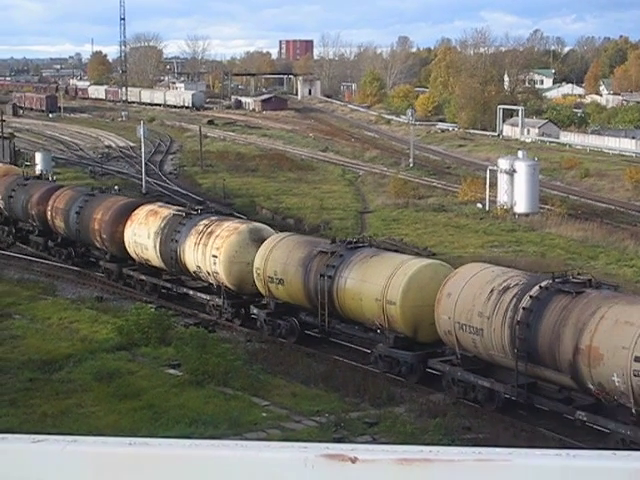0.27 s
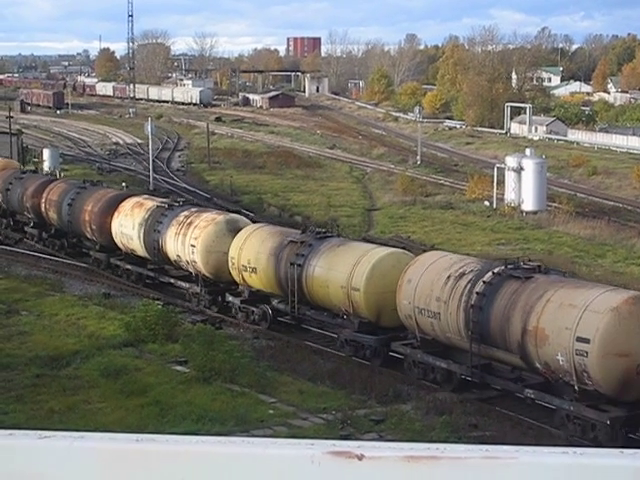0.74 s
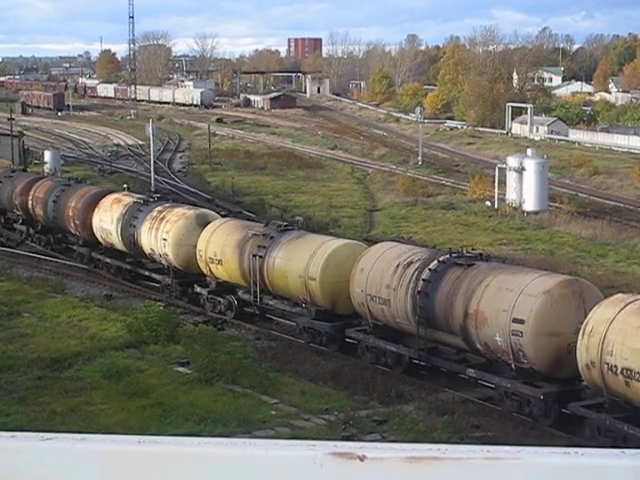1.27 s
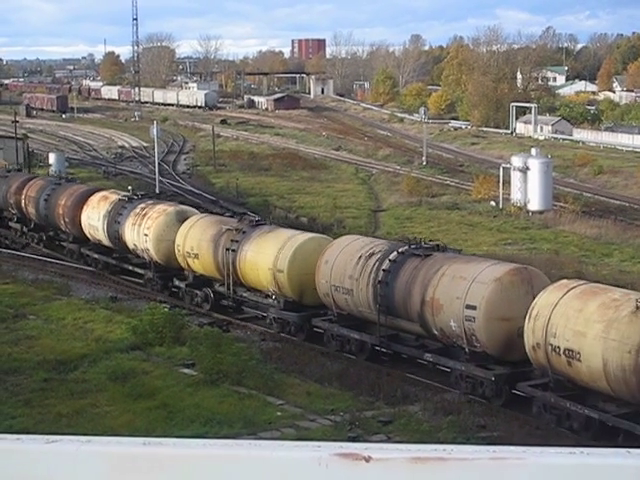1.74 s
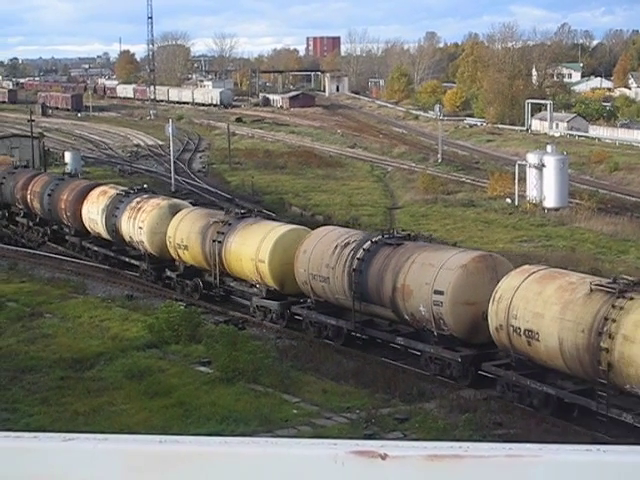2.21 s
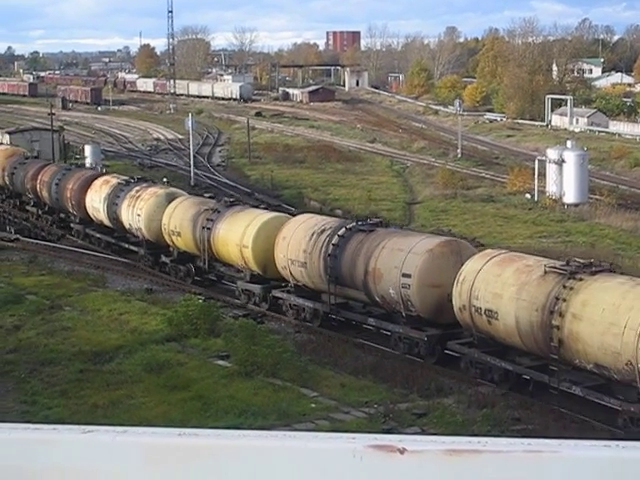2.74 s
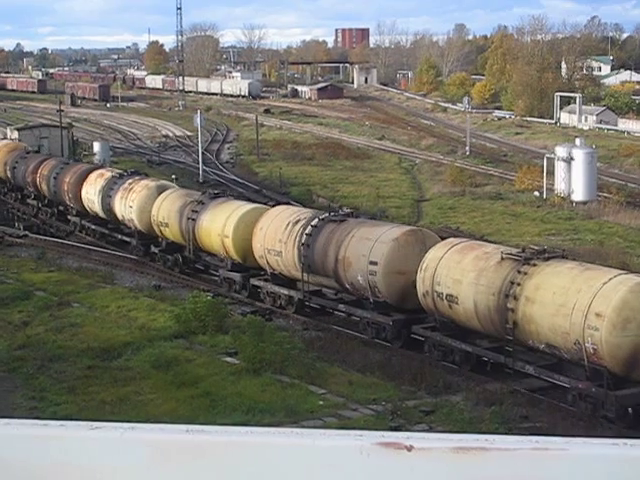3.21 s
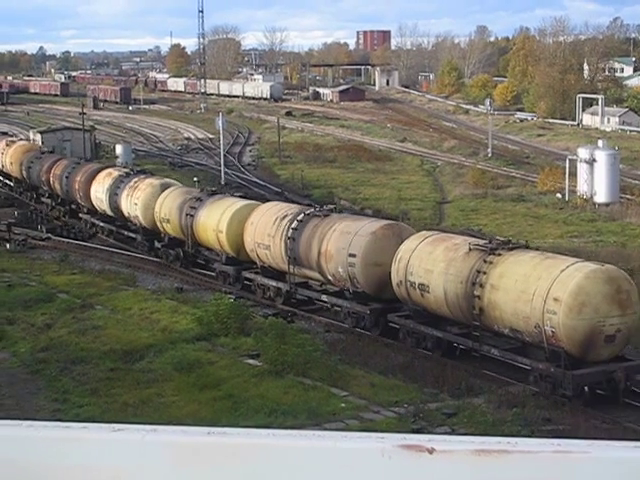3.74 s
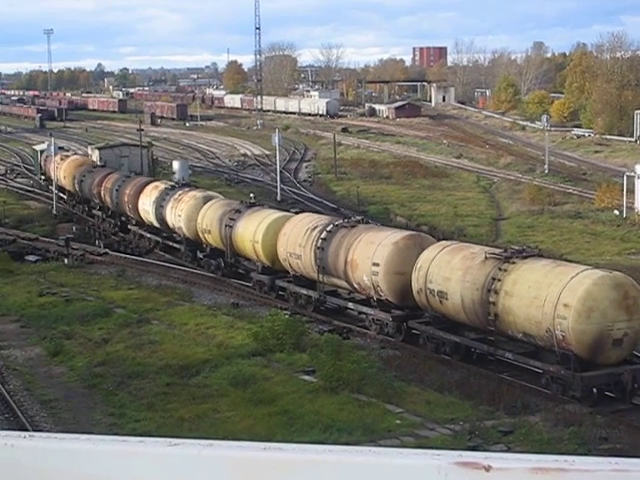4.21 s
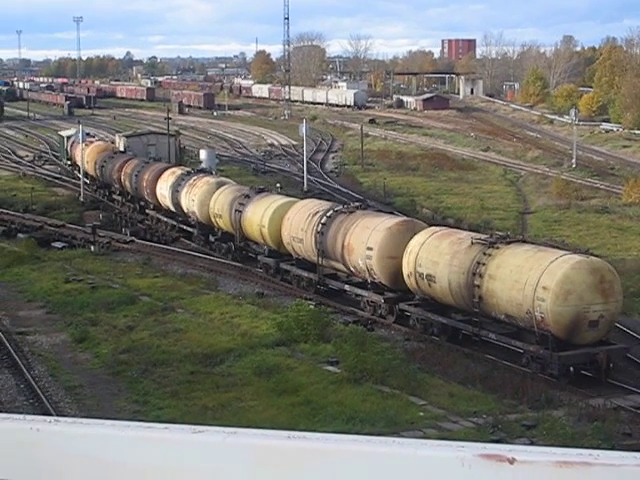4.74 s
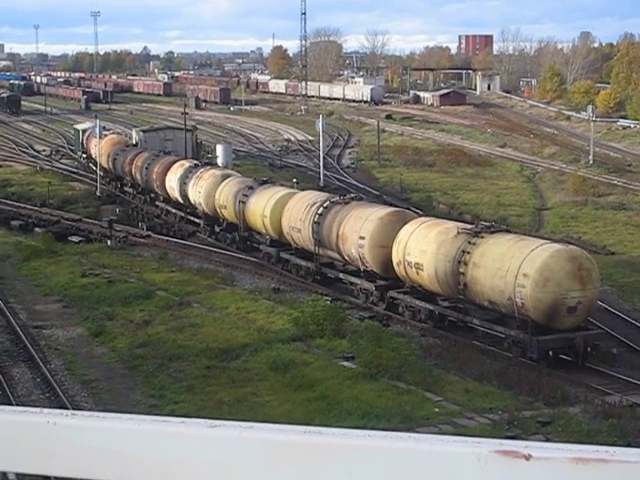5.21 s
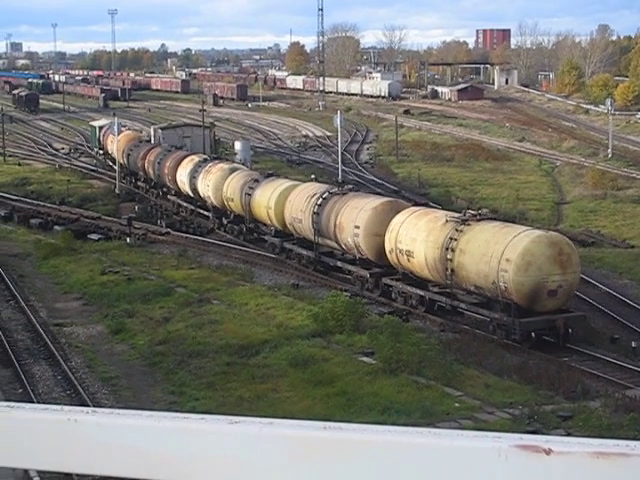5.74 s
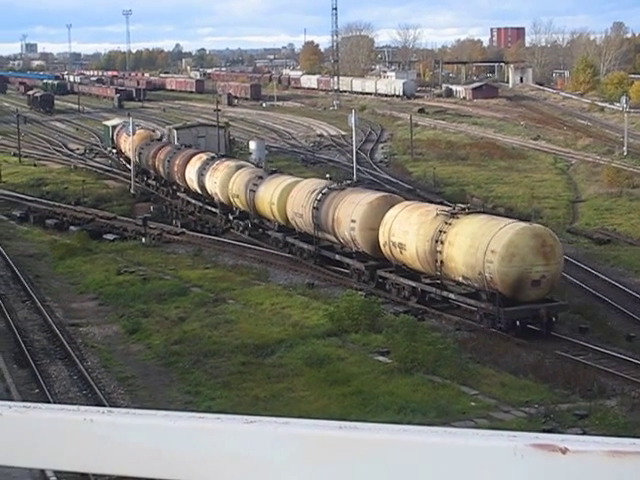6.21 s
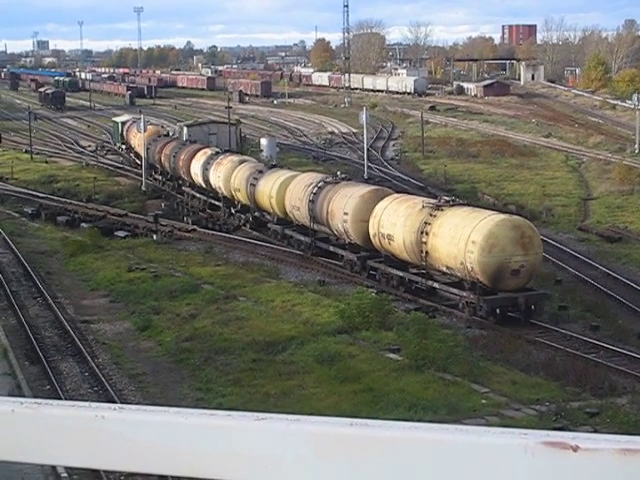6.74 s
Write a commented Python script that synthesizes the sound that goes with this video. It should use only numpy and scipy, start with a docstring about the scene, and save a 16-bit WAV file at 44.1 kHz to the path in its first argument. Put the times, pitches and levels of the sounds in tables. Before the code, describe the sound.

From 0 s a heavy tank train rolls past close by in an open yard: deep ground thuds, a dense low rumble and a coarse mid roar, surging unevenly, with brake shoes hissing and grit sizzling on top. Faint high chatter and short squeaks flicker through; light coupling pings sound near 0.6, 0.9, 1.2 and 1.8 s, with quick chirps around 1.8 and 2.2 s. From 2.8 to 3.4 s thin high notes sing weakly inside the roar. A knock at 3.45 s leads to a hard cluster of clanks near 4.0 s, and the rumble sinks away. Piercing squeals burst out at 4.1 s and 4.4-4.9 s, a knock among them at 4.6 s. From 5 to 7 s, over fading rolling and a quiet yard drone, several wheels squeal together, medium-high to very shrill, wavering, beating and overlapping, unfinished at the end. The small camera sound is gritty, with harsh, limited treble.

```python
"""A train of tank wagons rolls through a yard brake below a footbridge, over the steady drone of the yard.
From the start wheels rumble and roar (noise bands), shoes hiss on treads and wheel discs chatter faintly
(narrow random bands); short locked notes and coupling knocks (decaying sines) soon join in.
After about four seconds the rumble sinks away and several discs squeal loudly at their own modes.
A small camera samples all this slowly, so the treble is mirrored about half its sampling rate."""
import sys
import numpy as np
from scipy import signal
from scipy.fft import rfft, irfft, next_fast_len
from scipy.io import wavfile
from scipy.ndimage import uniform_filter1d, minimum_filter1d, map_coordinates

SR = 44100
rng = np.random.default_rng(int(sys.argv[2]) if len(sys.argv) > 2 else 0)


def int16_out(signal):
    """Quantize to a 16-bit WAV file."""
    q = np.round(np.clip(np.atleast_2d(signal).T, -1, 1) * 32767)
    wavfile.write(sys.argv[1], SR, q.astype(np.int16))


N = 306916  # length in samples


def amp(db):
    """Level: 20 dB is a factor of ten in amplitude."""
    return 10 ** (np.asarray(db) / 20)


def unit(x):
    """Normalisation: scales a signal to an rms value of 1."""
    return x / np.sqrt(np.mean(np.abs(x) ** 2) + 1e-20)


def along(points, hz):
    """Spectral envelope: levels interpolated along a logarithmic frequency axis."""
    f, level = np.transpose(points)
    return np.interp(np.log(hz + 1), np.log(f + 1), level)


def curves(rows):
    """Time envelopes: one value per sample for each column after the time."""
    s, *columns = np.transpose(rows)
    return [np.interp(np.arange(N) / SR, s, column) for column in columns]


def wobble(rate):
    """Slow random modulation: a spline through random knots, at most 90 a second."""
    knots = rng.standard_normal(int(N * 90 / SR) + 4)
    return map_coordinates(knots, [np.arange(N) * min(rate, 90) / SR])


def filtered(x, response):
    """Linear filtering: the spectrum is multiplied by a response of frequency."""
    m = next_fast_len(N + 8192)
    return irfft(rfft(x, m) * response(np.fft.rfftfreq(m, 1 / SR)), m)[..., :N]


def rush(spectrum, patchy_db):
    """Coloured noise: white noise with patches of random gain in time and frequency, then filtered."""
    z = signal.stft(rng.standard_normal(N + 512), nperseg=512)[2]
    field = uniform_filter1d(rng.standard_normal(z.shape), size=4, axis=0)
    field = uniform_filter1d(field, size=12, axis=1)
    patchy = signal.istft(z * amp(patchy_db * unit(field)), nperseg=512)[1][:N]
    return unit(filtered(patchy, lambda hz: amp(along(spectrum, hz))))


def smear(size, width_hz, skirt_db):
    """Narrow-band noise: a complex random swing of rms 1 with a narrow core and a weak wide skirt."""
    m = next_fast_len(size)
    off = np.fft.fftfreq(m, 1 / SR) / width_hz
    shape = np.exp(-.7 * off ** 2) + amp(skirt_db) / (1 + (off / 1.8) ** 2)
    random_phase = np.exp(2j * np.pi * rng.random(m))
    return unit(np.fft.ifft(shape * random_phase)[:size])


def evened(swing):
    """Self-limiting oscillation: friction feeds a weak swing and curbs a strong one."""
    share = .25  # how much of the level swings is ironed out
    return unit(swing / (np.abs(swing) + 0.06) ** share)


def sample_at(t):
    """Sampling: the nearest sample number for each time."""
    return np.round(t * SR).astype(int)


def squeal(start, end, hz_of, swing_of, db_of, octave_db, fade):
    """Modal vibration: a swing carried at the mode's pitch, with the octave of the lopsided slip."""
    a, b = max(round(start * SR), 0), min(round(end * SR), N)
    t = np.arange(a, b) / SR
    carrier = np.exp(2j * np.pi * np.cumsum(hz_of(t)) / SR)
    swing = swing_of(b - a) * carrier
    swing = swing + amp(octave_db) * swing ** 2 / (np.abs(swing) + .1)
    time_left = end - t + (b >= N - 2)  # a sound cut by the end of the scene does not fade out
    edge = np.clip(np.minimum(t - start, time_left) / fade, 0, 1)
    return slice(a, b), np.sqrt(2) * amp(db_of(t)) * edge * swing.real


# far yard, relative spectral density: f/Hz, level/dB
YARD_SPECTRUM = [(24, -41), (40, -7.5), (160, -7), (300, -2), (420, -12), (700, -14), (1020, -5.5),
                 (1300, -12.5), (1800, -16.5), (2340, -42), (3960, -120)]


def yard():
    """Stationary noise: the steady drone of the far yard."""
    return amp(-43) * rush(YARD_SPECTRUM, patchy_db=1)


# rolling noise: t/s, thud level/dB, rumble level/dB, roar level/dB
ROLLING_LEVELS = [(0, -21, -18.5, -22.5), (.9, -21.5, -19, -23.5), (1.07, -27.5, -21, -25),
                  (1.3, -24.5, -19, -22), (2.1, -23.5, -19.5, -22.5), (3.0, -24, -19.5, -22),
                  (3.42, -23.5, -22, -22), (3.9, -29.5, -20.5, -21), (4.08, -32.5, -26, -22),
                  (4.14, -35, -29.5, -25), (4.24, -34, -30.5, -29), (4.5, -26, -26, -23.5),
                  (4.6, -38, -32.5, -30.5), (4.92, -35, -28.5, -30.5), (5.0, -50, -42.5, -43),
                  (5.27, -41, -35.5, -38), (5.68, -48.5, -47.5, -45.5), (5.95, -47, -43, -42),
                  (6.55, -42, -38, -39), (6.96, -42.5, -39, -39)]
# relative spectral densities of ground and bridge, wagon bodies, and rails: f/Hz, level/dB
THUD_SPECTRUM = [(12, -42), (20, -3.5), (22, -11), (54, -2), (170, -1), (220, -26), (370, -120)]
RUMBLE_SPECTRUM = [(97, -33.5), (165, -8), (232, 2.5), (409, -8.5), (450, -9.5), (580, -33), (990, -120)]
ROAR_SPECTRUM = [(240, -22.5), (400, -5.5), (576, 2), (760, -1), (890, -2), (978, 0.5), (1200, -2.5),
                 (1320, -7.5), (1570, -4.5), (1800, -15), (2340, -19), (3960, -120)]


def rolling(surge_db, jolt, grain):
    """Roughness excitation: rough treads shake ground, wagons and rails, each with its own spectrum."""
    thud_db, rumble_db, roar_db = curves(ROLLING_LEVELS)
    thud_db = thud_db + 0.65 * surge_db + 0.55 * jolt + 1.2 * grain + 0.49 * wobble(6)
    rumble_db = rumble_db + 0.51 * surge_db + 0.98 * jolt + 1.3 * grain
    roar_db = roar_db + surge_db + 0.5 * jolt + 1.7 * grain
    thud = amp(thud_db) * rush(THUD_SPECTRUM, patchy_db=1.76)
    rumble = amp(rumble_db) * rush(RUMBLE_SPECTRUM, patchy_db=1.0)
    roar = amp(roar_db) * rush(ROAR_SPECTRUM, patchy_db=1.5)
    return thud + rumble + roar


# rubbing noise: t/s, hiss level/dB, sizzle level/dB
RUBBING_LEVELS = [(0, -32.5, -33), (.25, -30, -28), (.4, -34.5, -33.5), (.95, -29, -29), (1.07, -29, -35),
                  (1.5, -28, -28.5), (2.1, -32.5, -33.5), (2.25, -28, -31), (2.6, -28.5, -29.5),
                  (3.1, -29, -26), (3.42, -29, -28.5), (4.0, -26.5, -27), (4.13, -36.5, -34.5),
                  (4.6, -34, -34), (5.1, -39, -37.5), (5.35, -39, -35), (5.58, -36.5, -30),
                  (5.64, -42.5, -38.5), (6.3, -38.5, -39), (6.96, -38, -40)]
# relative spectral densities of shoes on treads, and of grit under the shoes: f/Hz, level/dB
HISS_SPECTRUM = [(1000, -18.5), (1700, -9), (1840, -4), (2380, -4), (3310, -1), (4000, -7.5), (5200, -24.5),
                 (8800, -120)]
SIZZLE_SPECTRUM = [(2350, -23.5), (4000, -4), (4470, -1.5), (4840, -6.5), (5500, -11), (7150, -46.5),
                   (12100, -120)]


def rubbing(surge_db, jolt, grain):
    """Friction noise: shoes hiss on the treads and grit sizzles under them."""
    hiss_db, sizzle_db = curves(RUBBING_LEVELS)
    hiss_db = hiss_db + 0.24 * surge_db + 1.2 * jolt + 0.92 * grain
    sizzle_db = sizzle_db + 0.44 * jolt
    hiss = amp(hiss_db) * rush(HISS_SPECTRUM, patchy_db=1.5)
    sizzle = amp(sizzle_db) * rush(SIZZLE_SPECTRUM, patchy_db=1.5)
    return hiss + sizzle


# wheel modes by name: drift of the centre as (t/s, f/Hz), width before evening/Hz, octave level/dB
WHEEL_MODES = {"low": ([(4.2, 1970), (4.5, 1990), (4.7, 1953), (5.0, 1985), (5.6, 1990), (5.8, 1990),
               (5.95, 2014), (6.15, 2001), (6.6, 2004), (6.75, 2034), (6.9, 2050)], 30.5, -27),
               "low twin": ([(4.5, 2040), (4.8, 2090), (5.1, 2070), (5.35, 2090), (5.6, 2082), (5.9, 2076),
               (6.3, 2057), (6.5, 2113), (6.7, 2056), (6.9, 2100)], 39, -29.5), "thin": ([(5.3, 2460),
               (6.0, 2386), (6.15, 2431), (6.8, 2480)], 33, -19.5), "dull": ([(1.2, 2646)], 54, -64),
               "shrill": ([(5.36, 2947), (5.5, 2883), (5.6, 2915), (5.74, 2900), (5.9, 2914), (6.1, 2933),
               (6.3, 2905), (6.5, 2900), (6.8, 2945)], 44, -21), "shrill twin": ([(4.75, 3045),
               (4.93, 3015), (5.0, 3030), (5.45, 3024), (6.4, 3000)], 32, -44.5), "sharp": ([(4.88, 3083),
               (5.05, 3145), (5.2, 3066), (5.32, 3113), (5.5, 3140), (5.75, 3140), (5.97, 3180),
               (6.2, 3130)], 30, -54.5), "brief": ([(.4, 3290), (1.1, 3390), (1.3, 3360), (4.5, 3420),
               (6.4, 3280)], 74, -60.5), "keen": ([(.8, 3510), (2.6, 3597), (3.9, 3590), (6.7, 3570),
               (6.9, 3540)], 55, -65.5), "keen twin": ([(4.2, 3676), (5.3, 3632)], 60, -52),
               "short": ([(2.0, 3945), (4.7, 3930), (5.1, 4013), (6.3, 3990)], 56, -67.5),
               "high": ([(1.0, 4190), (1.3, 4093), (4.2, 4080), (4.47, 4030), (4.6, 4130), (4.9, 4118),
               (5.3, 4140), (6.1, 4150), (6.3, 4170), (6.7, 4140), (6.9, 4170)], 65, -57.5),
               "high twin": ([(1.1, 4300), (1.35, 4280), (4.85, 4240), (5.2, 4260), (5.33, 4270),
               (6.25, 4215), (6.38, 4270), (6.48, 4320), (6.7, 4295), (6.82, 4250), (6.96, 4235)], 37, -49),
               "bright": ([(.15, 4414), (.9, 4500), (1.8, 4513), (3.0, 4554), (4.0, 4534)], 77, -57.5),
               "peep": ([(1.25, 4880), (5.3, 4770)], 30, -63), "whistle": ([(.5, 5090), (.7, 5120),
               (.95, 5060)], 66, -74), "topmost": ([(2.0, 5495)], 40, -57)}
# modes that chatter without a break: mode, level as (t/s, level/dB)
HELD_CHATTER = [("bright", [(1.6, -36), (1.77, -25.5), (1.91, -37), (2.2, -29.5), (2.88, -31),
                (3.04, -23.5), (3.42, -37), (3.88, -26), (4.05, -37.5)]), ("keen", [(2.95, -39),
                (3.33, -22), (3.42, -30), (3.55, -29.5), (3.63, -27), (3.95, -35.5)]),
                ("keen twin", [(4.1, -23.5), (4.2, -16.5), (4.34, -31.5), (4.83, -34), (4.95, -21),
                (5.1, -28), (5.2, -27.5), (5.39, -32.5), (5.46, -33), (5.57, -44)]), ("low", [(4.15, -28),
                (4.24, -38), (4.36, -28), (4.47, -14.5), (4.65, -27), (4.72, -16.5), (5.0, -23.5),
                (5.3, -24), (5.56, -26), (5.75, -27.5), (6.0, -28), (6.12, -30), (6.3, -33), (6.5, -33),
                (6.96, -37.5)]), ("short", [(4.45, -32.5), (4.96, -32), (5.15, -40.5), (5.25, -29.5),
                (5.75, -44), (5.95, -32.5), (6.08, -43), (6.25, -36), (6.4, -39.5)]),
                ("high", [(4.48, -29.5), (4.63, -24), (4.78, -35), (4.85, -29), (5.15, -40), (5.24, -26.5),
                (5.38, -26.5), (5.77, -37.5), (6.05, -36.5), (6.26, -24), (6.4, -39.5), (6.96, -21.5)]),
                ("thin", [(4.5, -39), (5.05, -46.5), (5.19, -38), (6.1, -37), (6.4, -32), (6.7, -50),
                (6.9, -38)]), ("low twin", [(4.45, -30), (4.62, -30.5), (4.85, -30.5), (5.03, -37),
                (5.37, -18.5), (5.42, -26), (5.6, -34), (5.7, -38.5), (5.88, -33), (6.15, -30),
                (6.31, -34.5), (6.62, -35.5), (6.84, -38), (6.96, -30.5)]), ("shrill", [(5.36, -34),
                (5.43, -25), (5.5, -21), (5.6, -15), (5.65, -23.5), (5.79, -15.5), (6.0, -21),
                (6.19, -18.5), (6.3, -25), (6.47, -30.5), (6.67, -28.5), (6.72, -35), (6.78, -32),
                (6.96, -31.5)])]
# short spells of chatter: mode, start t/s, end t/s, start level/dB, end level/dB
CHATTER_SPELLS = [("bright", 0.11, .36, -28.5, -37), ("bright", .45, .94, -31.5, -29),
                  ("whistle", .45, .72, -32, -30), ("whistle", .76, 0.91, -32, -31),
                  ("keen", .65, 1.02, -33.5, -39), ("high", 0.98, 1.05, -27.5, -28),
                  ("high", 1.1, 1.3, -33, -30.5), ("high twin", 1, 1.36, -34.5, -36.5),
                  ("brief", 0.43, .46, -35, -36), ("keen", 0, .25, -44, -39),
                  ("high", 4.19, 4.25, -34, -36), ("brief", 4.22, 4.3, -36, -39),
                  ("brief", 4.4, 4.78, -39, -42.5), ("shrill twin", 4.45, 4.6, -38.5, -40.5),
                  ("brief", 1.1, 1.29, -28.5, -31.5), ("dull", 1.22, 1.42, -33, -32),
                  ("dull", 1.5, 1.72, -33, -35), ("dull", 2.3, 2.4, -38, -36),
                  ("high", 1.8, 1.95, -32, -35), ("peep", 1.25, 1.35, -38, -41),
                  ("topmost", 1.66, 1.76, -38.5, -44), ("short", 1.8, 2.03, -30.5, -31.5),
                  ("keen", 2.52, 2.66, -27.5, -27.5), ("topmost", 2.88, 2.96, -30.5, -35),
                  ("topmost", 3.0, 3.4, -39, -36.5), ("topmost", 3.45, 3.95, -41.5, -43),
                  ("dull", 3.36, 3.6, -29.5, -31.5), ("short", 3.62, 3.98, -32.5, -30.5),
                  ("dull", 3.75, 3.97, -36, -36), ("topmost", 4.3, 4.9, -50, -50),
                  ("shrill twin", 4.77, 5.0, -33, -30.5), ("high twin", 4.84, 5.4, -29.5, -37),
                  ("sharp", 4.93, 5.15, -26, -28), ("peep", 5.2, 5.5, -41, -45),
                  ("keen", 5.42, 5.55, -38, -42), ("sharp", 5.31, 5.5, -26.5, -29),
                  ("shrill twin", 5.36, 5.57, -29, -31), ("sharp", 5.76, 6.25, -33, -43.5),
                  ("high twin", 6.2, 6.34, -28.5, -27.5), ("high twin", 6.42, 6.96, -27.5, -24.5),
                  ("brief", 6.24, 6.68, -36, -38), ("shrill twin", 6.36, 6.68, -31, -35),
                  ("keen", 6.7, 6.96, -30.5, -21.5)]


def chattering_modes():
    """Stick-slip excitation: shoes chatter on the wheels in narrow bands about the disc modes."""
    swell_s, ring_s = .07, .1  # swelling up before the first level, dying back after the last
    edge_db = -15.5  # level at both ends, relative to the neighbouring level
    wander_hz, falter_db = 5.01, 1.6  # scales of the wavering in pitch and level
    out = np.zeros(N)
    spells = [(mode, [(a, a_db), (b, b_db)]) for mode, a, b, a_db, b_db in CHATTER_SPELLS]
    for mode, level in HELD_CHATTER + spells:
        s, db = np.transpose(level)
        s = np.r_[s[0] - swell_s, s, s[-1] + ring_s]
        db = np.r_[db[0] + edge_db, db, db[-1] + edge_db]
        drift, width_hz, octave_db = WHEEL_MODES[mode]
        wander, falter = wobble(9), wobble(45)
        centre = lambda t: np.interp(t, *np.transpose(drift)) + wander_hz * wander[sample_at(t)]
        chatter = lambda n: evened(smear(n, width_hz, skirt_db=-28))
        loudness = lambda t: np.interp(t, s, db) + falter_db * falter[sample_at(t)]
        where, sound = squeal(s[0], s[-1], centre, chatter, loudness, octave_db, fade=0.012)
        out[where] += sound
    return out


# surges of the rolling and rubbing noise: t/s, rise in level before each layer's share/dB
LEVEL_SURGES = [(.24, 4), (.5, 1.5), (1.02, 2), (1.51, 3), (1.85, 0), (3.55, 1.5), (4.038, 8), (4.401, 5.5),
                (4.87, 3)]


def level_surges():
    """Asymmetric surges: the rolling and rubbing noise swells slowly and drops off fast."""
    build_s, cut_s = 0.063, 0.022
    t = np.arange(N) / SR
    return sum(db * np.exp(-((t - s) / np.where(t < s, build_s, cut_s)) ** 2) for s, db in LEVEL_SURGES)


# notes where the slip locks onto one pitch: start t/s, end t/s, f/Hz, level/dB
LOCKED_NOTES = [(0.38, 0.528, 4380, -30.5), (0.943, 1.037, 4222, -27), (1.215, 1.302, 2540, -31),
                (1.249, 1.32, 4100, -27), (1.195, 1.326, 4785, -29), (1.49, 1.6, 4820, -31),
                (1.074, 1.3, 3390, -41), (1.817, 1.991, 3900, -33), (2.047, 2.183, 4522, -29),
                (2.77, 3.107, 4550, -27.5), (2.86, 3.38, 5510, -42.5), (3.194, 3.44, 3596, -28),
                (4.09, 4.281, 3645, -23), (4.09, 4.26, 3700, -22), (4.43, 4.546, 2015, -15.5),
                (4.506, 4.644, 1971, -14), (4.519, 4.7, 4050, -28), (4.596, 4.84, 1951, -16.5),
                (4.84, 4.93, 1985, -18.5), (4.79, 4.9, 3900, -28), (4.83, 4.98, 3050, -29),
                (4.86, 5.1, 3648, -20), (5.13, 5.23, 3648, -24), (4.99, 5.09, 3125, -28),
                (4.95, 5.3, 4240, -26.5), (5.175, 5.29, 4238, -16), (5.09, 5.25, 4545, -31),
                (5.12, 5.23, 1995, -22), (5.23, 5.31, 4140, -23), (5.281, 5.438, 2050, -26),
                (5.302, 5.517, 3100, -29), (5.417, 5.567, 1989, -19.5), (5.4, 5.6, 2889, -19.5),
                (5.454, 5.652, 3530, -35), (5.578, 5.736, 2935, -20.5), (5.7, 5.84, 2905, -19.5),
                (5.8, 5.99, 2925, -24), (5.74, 5.97, 3118, -26), (5.87, 6.015, 2028, -25.5),
                (5.699, 5.95, 2105, -33), (5.97, 6.217, 2930, -17), (6.0, 6.09, 3620, -37),
                (6.184, 6.361, 1994, -22.5), (6.19, 6.35, 4005, -27.5), (6.19, 6.453, 2910, -22),
                (6.082, 6.91, 4910, -42), (5.836, 6.1, 4800, -50), (5.799, 5.92, 4100, -31),
                (6.247, 6.5, 2420, -36), (6.343, 6.438, 2408, -27.5), (6.46, 6.68, 3040, -33),
                (6.361, 6.84, 4237, -16.5), (6.681, 6.8, 2045, -24), (6.771, 6.88, 2095, -21.5),
                (6.8, 6.92, 2050, -25), (6.84, 7.0, 3520, -23)]
# quick chirps of a single slip: start t/s, end t/s, start f/Hz, end f/Hz, level/dB
SLIP_CHIRPS = [(1.79, 1.86, 3160, 3150, -22), (1.796, 1.86, 2050, 2050, -31), (2.21, 2.28, 2230, 2110, -25),
               (1.238, 1.31, 4330, 4300, -28), (1.25, 1.3, 4600, 3900, -28),
               (2.24, 2.31, 3320, 3110, -22.5), (2.33, 2.38, 3120, 3130, -31),
               (2.17, 2.23, 3150, 3150, -31), (2.17, 2.23, 2500, 2480, -34), (2.4, 2.46, 2480, 2480, -30),
               (.95, 1.02, 2530, 2530, -29), (4.26, 4.32, 1975, 1975, -26)]


def locked_notes():
    """Mode locking and beats: the slip locks into a clear note and a neighbouring wheel beats against it."""
    beat_db, beat_hz = -12, 42.15  # neighbour's relative level and typical distance in pitch
    bend_hz = 2.97  # scale of the random bending of the pitch
    out = np.zeros(N)
    bend = wobble(16)
    steady_notes = [(a, b, hz, hz, db) for a, b, hz, db in LOCKED_NOTES]
    for start, end, hz, to_hz, db in steady_notes + SLIP_CHIRPS:
        apart_hz = beat_hz * rng.choice([-1, 1]) * rng.uniform(.6, 1.4)
        shift = lambda n: np.exp(2j * np.pi * apart_hz * np.arange(n) / SR)
        neighbour = lambda n: amp(beat_db) * smear(n, width_hz=12, skirt_db=-21) * shift(n)
        pitch = lambda t: np.interp(t, [start, end], [hz, to_hz]) + bend_hz * bend[sample_at(t)]
        loose = np.clip((-11 - db) / 45, 0, 1)  # a weak lock wavers more
        waver = lambda n: np.sqrt(loose) * smear(n, width_hz=11, skirt_db=-13.5)
        swing = lambda n: np.sqrt(1 - loose) + waver(n) + neighbour(n)
        octave_db = -28 - 40 * (hz > 3000)  # the microphone loses the octaves of high notes
        where, sound = squeal(start, end, pitch, swing, lambda t: db, octave_db, fade=0.047)
        out[where] += sound
    return out


# coupling knocks and pings: t/s, level before the onset/dB, f/Hz, time to decay by 60 dB/s
COUPLING_PINGS = [(.565, -18, 1192, 0.22), (.86, -23.5, 1580, 0.34), (1.15, -22.5, 1554, 0.3),
                  (1.82, -23, 1600, 0.35), (3.45, -15, 1000, 0.18), (3.97, -13, 897, 0.11),
                  (4.0, -13.5, 475, .1), (4.02, -14, 1136, 0.11), (4.028, -5, 595, .06),
                  (4.036, -11, 1146, .04), (4.064, -9, 690, 0.066), (4.56, -11, 778, 0.084),
                  (4.968, -27.5, 790, 0.2), (5.099, -23.5, 788, 0.29), (5.86, -33.5, 1080, .25),
                  (6.28, -28.5, 290, .15), (6.77, -31, 598, .15), (6.772, -28, 320, 0.23)]


def couplings():
    """Damped free vibration: slack couplings and loose steel ring one short note when they pull tight."""
    out, t = np.zeros(N + SR), np.arange(SR // 2) / SR
    onset = 1 - np.exp(-t / 0.0032)
    for s, db, hz, t60 in COUPLING_PINGS:
        ping = amp(db - 60 * t / t60) * onset * np.sin(2 * np.pi * hz * t)
        out[round(s * SR):][:len(t)] += ping
    return out[:N]


def scene():
    """Superposition: all sources add, and rolling and rubbing share the unevenness of track and treads."""
    surge_db = level_surges()
    jolt, grain = wobble(12), wobble(55)  # uneven track; the faster grain of worn treads
    noise = yard() + rolling(surge_db, jolt, grain) + rubbing(surge_db, jolt, grain)
    return (noise + chattering_modes() + locked_notes() + couplings())[None]


def limiter(x, hold=0.004):
    """Gain control: the gain falls just ahead of each peak over the ceiling and comes back soon after."""
    ceiling = .52
    n = int(hold * SR)
    need = np.minimum(1, (ceiling / (np.abs(x) + 1e-9)) ** .75)  # peaks are reduced, not held flat
    lowest = minimum_filter1d(need, size=2 * n + 1, axis=-1)
    return x * uniform_filter1d(lowest, size=n, axis=-1)


# filter with which the camera rebuilds its samples: f/Hz, gain/dB
REBUILD_FILTER = [(4000, 0.5), (5000, -3), (5500, -1), (6000, -12.5), (6500, -25), (6800, -34.5),
                  (7000, -41.5), (7300, -64.5)]


def record(dry):
    """Aliasing: keeping every fourth sample mirrors the spectrum, and the filter lets part of it through."""
    step, offset = 4, .0432  # samples per kept sample; constant shift of the waveform
    top_hz = 7250  # nothing passes from here up
    kept = step * (limiter(dry) + offset) * (np.arange(N) % step == 0)
    return filtered(kept, lambda hz: amp(along(REBUILD_FILTER, hz)) * (hz < top_hz))


dry = scene()
out = record(dry)
int16_out(out)
```